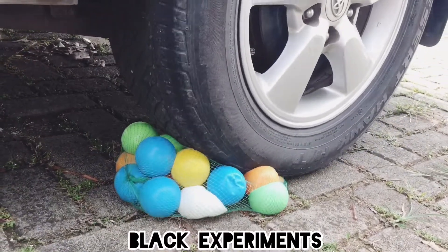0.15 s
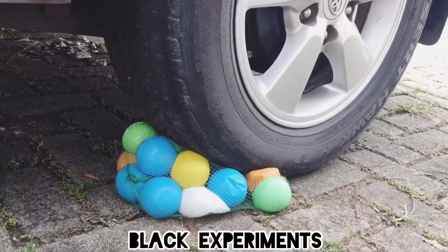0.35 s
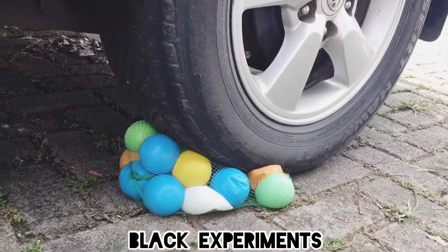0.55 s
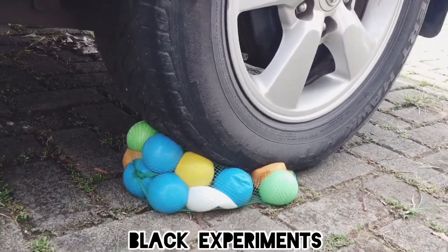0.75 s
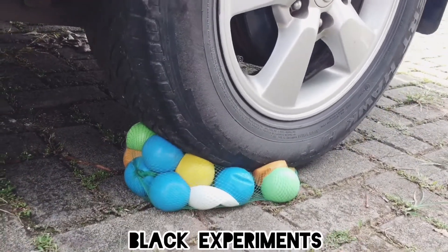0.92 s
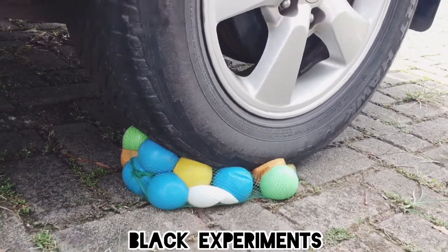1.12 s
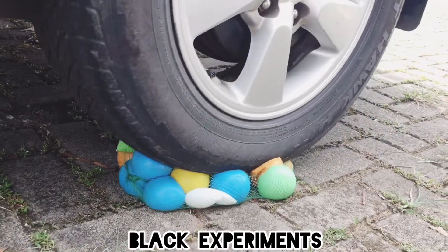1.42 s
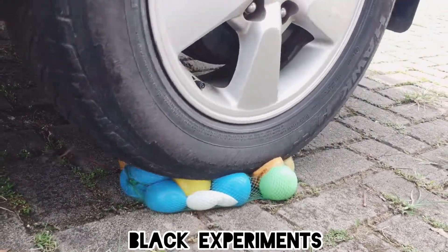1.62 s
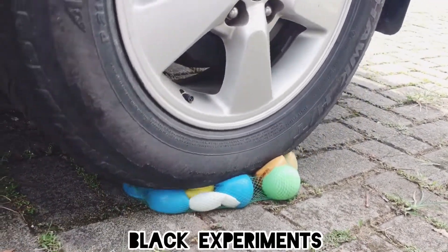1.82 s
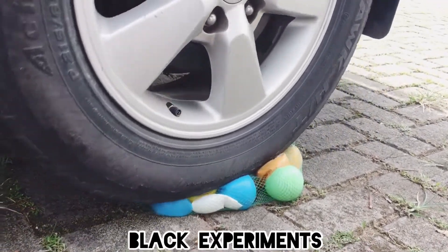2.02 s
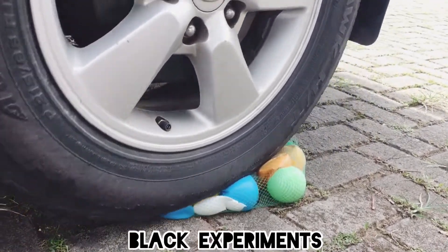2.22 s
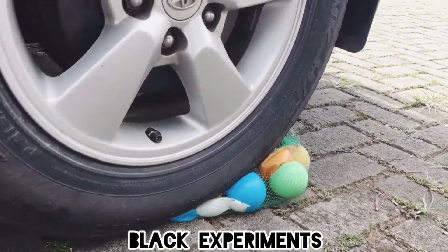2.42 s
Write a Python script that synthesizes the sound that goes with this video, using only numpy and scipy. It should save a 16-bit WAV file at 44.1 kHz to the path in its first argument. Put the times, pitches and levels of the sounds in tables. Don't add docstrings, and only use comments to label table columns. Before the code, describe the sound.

Hollow plastic balls crack, pop and burst under a slowly rolling car tyre, engine idling beneath

```python
import sys
import numpy as np
from scipy import signal
from scipy.fft import rfft, irfft
from scipy.io import wavfile
from scipy.ndimage import uniform_filter1d

SR = 44100
rng = np.random.default_rng(int(sys.argv[2]) if len(sys.argv) > 2 else 0)


def generate_wav(sig):
    pcm = np.round(np.clip(np.atleast_2d(sig).T, -1, 1) * 32767).astype(np.int16)
    wavfile.write(sys.argv[1], SR, pcm)


def invert_db(x):
    u = np.asarray(x, float) / 20
    return 10 ** u


N = 112454

# time in seconds, crackle level in dB, escaping air level in dB.
WEIGHT_ON_PILE = [(0, -37.5, -41), (.25, -29, -43), (.55, -32.5, -42.5), (.9, -35.5, -43), (1.02, -35, -54),
                  (1.14, -50, -64), (1.2, -37, -45.5), (1.45, -38.5, -53), (1.51, -45, -37.5),
                  (1.535, -36, -30), (1.67, -30.5, -43.5), (1.82, -33, -26), (1.91, -35, -31.5),
                  (2.0, -37, -38), (2.05, -27, -38), (2.2, -29.5, -24.5), (2.42, -31.5, -35),
                  (2.55, -29, -56)]


def evened(x):
    return x / np.sqrt(np.mean(x ** 2) + 1e-20)


def curve(rows, col=1):
    rows = np.array(rows)
    return np.interp(np.arange(N) / SR, rows[:, 0], rows[:, col])


def add(mix, s, sound):
    part = mix[max(round(s * SR), 0):][:len(sound)]
    part += sound[:len(part)]


def noise(points, size=N):
    hz = np.fft.rfftfreq(size, 1 / SR)
    f, db = np.transpose(points)
    gain = invert_db(np.interp(np.log(hz + 1), np.log(f + 1), db, left=-60))
    return evened(irfft(rfft(rng.standard_normal(size)) * gain, size))


def wander(smoothing, size=N):
    return evened(uniform_filter1d(rng.standard_normal(size), smoothing))


def resonate(x, hz, width):
    r = np.exp(-np.pi * width / SR)
    return signal.lfilter([1 - r * r, 0, r * r - 1], [1, -2 * r * np.cos(2 * np.pi * hz / SR), r * r], x) / 2


def resonate_twice(x, hz, width):
    return evened(resonate(resonate(x, hz, width), hz, width))


def engine():
    # time in seconds, engine cycles per second.
    cycle_speed = [(0, 24.15), (.6, 24.05), (1.1, 23.74), (1.8, 24.29), (2.1, 26.14), (2.55, 26.35)]
    # multiple of the cycle rate, level in dB.
    low_tones = [(2, -36), (3, -48.5), (4, -36), (5, -46.5), (6, -56), (8, -42), (9, -52.5)]
    # pitch in Hz, width in Hz, level in dB.
    pipe_modes = [(213, 17, 0), (266, 12, 9), (344, 96, -4.5), (513.5, 13, 0.5), (714, 20, 3)]
    # frequency in Hz, level in dB.
    block_colour = [(30, -34), (45, -3), (262, -12.5), (826, -16.5), (1150, -20.5), (1870, -14.5),
                    (2230, -23), (2960, -19.5), (15500, -111)]
    weak_firing, jitter = 0.086, 0.027
    knock_depth, knock_fade, knock_lag = 3.7, 0.39, 0.45
    turns = np.cumsum(curve(cycle_speed)) / SR + 0.96
    tones = np.zeros(N)
    for k, db in low_tones:
        tone = np.sqrt(2) * np.cos(2 * np.pi * k * turns)
        tones += invert_db(db) * tone * (1 + 0.41 * wander(2500))

    fire = np.floor(2 * turns + jitter * wander(900))
    strength = np.where(fire % 2, weak_firing, 1) * invert_db(0.73 * rng.standard_normal(N))
    pulses = (np.diff(fire, prepend=fire[0]) > 0) * strength
    drive = evened(pulses) + 1.16 * rng.standard_normal(N)
    drive = uniform_filter1d(uniform_filter1d(drive, size=24), size=24)
    pipe = evened(sum(invert_db(db) * resonate(drive, hz, max(width, 25)) for hz, width, db in pipe_modes))

    knock = 1 + knock_depth * np.exp(-((turns - knock_lag) % 1) / knock_fade)
    block = evened(noise(block_colour) * knock)
    whine = np.sqrt(2) * np.cos(2 * np.pi * 21.2 * turns + 0.34 * wander(1500))
    return tones + invert_db(-43) * whine + invert_db(-29.5) * pipe + invert_db(-29.5) * block


def crackle():
    folds_per_s, spread_db = 3500, 2.4
    size = invert_db(spread_db * np.minimum(rng.exponential(1, N), 3.5))
    size = size * (rng.random(N) < folds_per_s / SR)
    kind = rng.integers(0, 24, N)
    t = np.arange(600) / SR
    out = np.zeros(N)
    for k, hz in enumerate(np.geomspace(900, 7000, num=24)):
        fade = t * hz * np.exp(-t * hz / 0.45)
        fold = np.sin(2 * np.pi * hz * t) * fade * (hz / 1e3) ** -0.2
        out += signal.oaconvolve(size * (kind == k), fold)[:N]
    return evened(out) * invert_db(curve(WEIGHT_ON_PILE) - 0.5)


def air():
    # frequency in Hz, level in dB.
    leak_colour = [(1500, -17), (3500, 0), (4700, -6.5), (7200, -5.5), (10500, -12), (14500, -10.5),
                   (16500, -14.5)]
    # frequency in Hz, level in dB.
    puff_colour = [(3000, -8), (6000, 12), (9000, 16), (10800, 9), (15000, 15), (16500, -14.5)]
    puff_starts = (.086, .2555, .486, .761, 1.21, 1.393, 1.522, 1.8315, 2.028)
    # length of the puff in seconds, level in dB.
    puff_sizes = [(0.011, -43), (0.095, -27.5), (.014, -28), (.012, -28), (.04, -46), (.018, -28),
                  (0.2, -35), (.016, -21), (0.35, -32.5)]
    jet_times = (2.18, 2.21, 2.3, 2.44)
    t = np.arange(N) / SR
    puffs = np.zeros(N)
    for s, (length, db) in zip(puff_starts, puff_sizes):
        rise = np.clip((t - s) * 300, 0, 1)
        fall = np.clip((s + length - t) / (0.71 * length), 0, 1)
        puffs += invert_db(db) * rise * fall
    leak = noise(leak_colour) * invert_db(curve(WEIGHT_ON_PILE, col=2))
    jet = resonate_twice(rng.standard_normal(N), 5900, 2600) * invert_db(-23.5)
    jet_opening = np.interp(t, np.sort(jet_times), [0.0072, 0.98, 0.48, 0.015])
    flicker = invert_db(1.4 * wander(300))
    return flicker * (leak + noise(puff_colour) * puffs + jet * jet_opening)


def crease(db, hz, bright_db):
    t = np.arange(1024) / SR
    ring_cycles, crack_t60 = 5.1, 0.003
    ring = np.sin(2 * np.pi * hz * t) * invert_db(-60 * t * np.sqrt(hz * 1000) / ring_cycles / 2)
    crack = evened(resonate(rng.standard_normal(1024), 6000, 7000))
    return invert_db(db) * (ring + crack * invert_db(bright_db - 60 * t / crack_t60))


def snap(db, hz, bright_db):
    # multiple of the main pitch, level in dB.
    wall_modes = [(1.0, 1.5), (1.62, -7), (2.3, -10), (3.4, -2.5)]
    hold = 0.0017
    crack_t60, cavity_t60, rattle_t60 = 0.0072, 0.0036, 0.026
    ring_t60 = 0.009 / (hz / 1000) ** 0.48
    t = np.arange(4096) / SR
    after = np.maximum(t - hold, 0)

    ring = np.zeros(4096)
    for k, (ratio, mode_db) in enumerate(wall_modes):
        level = mode_db - hz * (ratio - 1) / 1000 - 60 * after * ratio ** 0.5 / ring_t60
        pitch = hz * ratio
        if k > 0:
            level = level + 2 * rng.standard_normal() + 0.45 * (bright_db + 3.5)
            pitch *= 1 + 0.063 * rng.standard_normal()
        ring += invert_db(level) * np.sin(2 * np.pi * min(pitch, 15e3) * t)

    cavity_hz = 1150 * (1 + 0.11 * rng.standard_normal())
    cavity = invert_db(-0.5 - 60 * after / cavity_t60) * np.sin(2 * np.pi * cavity_hz * t)
    cavity *= np.minimum(t / hold, 1)
    crack = evened(resonate(rng.standard_normal(4096), 5300, 8400))
    crack *= invert_db(bright_db + 4.5 - 60 * t / crack_t60)
    rattle = resonate_twice(rng.standard_normal(4096), min(hz, 2200), 3430)
    rattle *= invert_db(-5 + 0.35 * (bright_db + 17.0) - 60 * t / rattle_t60)
    ring *= np.minimum(t / 0.0001, 1)
    rattle *= np.minimum(t / 0.00019, 1)
    return invert_db(db - 9.0) * (ring + cavity + crack + rattle)


def groan(hz, sag_db, length, db):
    t = np.arange(0, length, 1 / SR)
    slips = rng.standard_normal(len(t))
    sag = resonate_twice(slips, 0.42 * hz, 200)
    sound = resonate_twice(slips, hz, 600) + invert_db(sag_db) * sag
    return invert_db(db) * sound * np.sqrt(t / length)


def burst(colour, db, hold, t60, thump_db):
    thump_hz, thump_lag, thump_t60, thump_drop = 50, 0.0155, 0.058, 150
    rip_t60, treble_t60 = 0.0072, 0.035
    t = np.arange(8192) / SR
    ragged = invert_db(2 * wander(60, 8192))
    rush = noise(colour, size=8192) * ragged
    low = uniform_filter1d(uniform_filter1d(rush, size=7), size=7)
    after = np.maximum(t - hold, 0)
    blast = low * invert_db(db - 60 * after / t60)
    blast += (rush - low) * invert_db(db - 60 * after / treble_t60)
    rip = rng.standard_normal(8192) * invert_db(db - 8 - 60 * t / rip_t60)

    late = t - thump_lag
    swell = invert_db(thump_db - 60 * np.maximum(late, 0) / thump_t60) * np.minimum(t / thump_lag, 1) ** 2
    cycles = thump_hz * late - thump_drop * np.minimum(late, 0) ** 2 / thump_lag / 2
    return blast + rip - swell * np.sin(2 * np.pi * cycles)


def balls():
    # start in seconds, peak in dB, ring in Hz, crack brightness in dB.
    creases = [(0.0286, -18, 6500, -13), (.0868, -13.5, 4170, -8), (0.0933, -14, 3070, -5),
               (.1065, -29, 2500, -6), (0.147, -24, 2500, -18), (0.2136, -23, 8900, -5),
               (0.2617, -12, 1000, -10), (0.3026, -10, 1010, -25), (0.4111, -24, 5000, 0),
               (0.4711, -14, 1000, -25), (.658, -29, 11000, 3), (0.683, -14, 2500, -15),
               (0.806, -19, 6100, 0), (.931, -12, 900, -12), (1.031, -34, 3800, -4),
               (1.161, -26, 1000, -11), (1.224, -27, 1500, -11), (1.248, -24, 6000, -8),
               (1.2983, -18, 1390, -6), (1.316, -22, 1500, -9), (1.398, -25, 5000, 0),
               (1.467, -20, 2500, -3), (1.481, -16, 3500, -5), (1.5224, -11, 1500, -6),
               (1.5435, -12, 1790, -6), (1.6447, -10, 1150, -5), (1.6878, -16, 2900, -3),
               (1.7, -16, 2900, -12), (1.727, -18, 6000, -6), (1.729, -14, 1800, -8),
               (1.737, -12, 1600, -3), (1.792, -20, 6500, -13), (1.8072, 1.5, 3370, -14),
               (1.82, -1, 1800, -14), (1.827, -8, 3000, -5), (1.874, -13, 2020, -3),
               (1.934, -4.5, 3430, 1.5), (1.962, -19, 10000, 1), (1.975, -19, 2000, -10),
               (1.989, -15.5, 2540, 2), (2.0061, -8, 3380, -9), (2.16, -10, 3020, -10),
               (2.5107, -24, 9000, 1), (0.9203, -14, 1300, -19)]
    # start in seconds, peak in dB, ring in Hz, crack brightness in
    # dB.
    shell_snaps = [(0.079, -4.5, 784, -13), (0.176, -9, 1830, -4.5), (0.21, -5, 1190, -10.5),
                   (0.234, -12.5, 1320, -5), (0.265, -7.5, 1160, 1), (0.282, -4.5, 1146, -3),
                   (0.328, 5.5, 2030, -4.5), (0.508, -5.5, 1113, 0.5), (0.759, -13.5, 1040, 13),
                   (0.837, 6, 1035, 2.5), (0.856, -8.5, 650, -1), (0.88, -2.5, 1120, -9),
                   (0.918, -13, 900, -10), (1.079, -22, 1820, -3), (1.094, -23, 1900, -3.5),
                   (1.1875, -15.5, 880, -13), (1.267, -9.5, 1000, -4.5), (1.275, -9.5, 1070, -5),
                   (1.295, -7, 1320, -10.5), (1.391, -8.5, 805, 3.5), (1.4103, 2, 1940, -13.5),
                   (0.3517, 0.5, 1420, -1.5), (0.4845, -4, 5930, 3),
                   (1.422, -12, 2010, -8), (1.4893, 6, 1600, -6.5), (1.528, -7, 1450, 0.5),
                  (1.548, -8, 870, -9), (1.565, -3.5, 1000, -30), (1.62, -3.5, 1150, -13),
                  (1.639, -2, 1150, -9.5), (1.6915, -4, 2000, -27), (1.7098, -4.5, 2880, -5),
                  (1.749, -6, 2140, -15), (1.758, -5.5, 1103, -6.5), (1.8, 1.5, 1150, -10),
                  (1.8645, -6, 1370, 0), (1.93, -6.5, 1150, 4), (1.955, -4, 1433, -16),
                  (2.05, -4, 1530, -10.5), (2.118, -6.5, 2540, -15), (2.152, -5.5, 1320, -3.5),
                  (2.1927, 9.5, 1466, -37), (2.469, -8.5, 775, -15.5), (2.508, -9, 1720, -15),
                  (0.2548, -13.5, 6930, 6.5), (2.0058, -5, 6200, -32)]
    # start in seconds, peak in dB, ring in Hz.
    ticks = [(0.0885, -12, 780), (0.115, -25, 1500), (0.7857, -11, 3270), (1.1988, -18.5, 3470),
             (1.462, -21, 4470), (1.63, -9.5, 1150), (1.7728, -8.5, 6493), (1.943, -17, 2500),
             (2.3544, -15.5, 930)]
    burst_starts = (.9525, 1.8305)
    # blast level in dB, hold in seconds, 60 dB fade in seconds, thump level in dB.
    burst_sizes = [
        (4.5, 0.0054, 0.045, -1.5),
        (-0.5, 0.0046, 0.027, -17.5),
    ]
    # frequency in Hz, level in dB.
    full_colour = [(120, -6), (380, 3), (800, -1), (1600, 0), (2400, -10), (3500, -15), (8000, -27),
                   (15500, -34)]
    # frequency in Hz, level in dB.
    thin_colour = [(100, -9), (200, -1), (400, -11.5), (700, -3), (1830, -5), (4290, -20.5), (9000, -18.5),
                   (16000, -34)]
    groan_pitches = (950, 1000)
    sag_levels = (0, -12)
    # length of the groan in seconds, level in dB.
    groan_sizes = [(.015, -12), (.028, -17)]
    out = np.zeros(N)
    for s, *row in creases:
        add(out, s, crease(*row))
    for s, *row in shell_snaps:
        add(out, s, snap(*row))
    for s, db, hz in ticks:
        add(out, s, snap(db, hz, -5.5))
    for s, colour, row in zip(burst_starts, (full_colour, thin_colour), burst_sizes):
        add(out, s, burst(colour, *row))
    for s, hz, sag_db, (length, db) in zip(burst_starts, groan_pitches, sag_levels, groan_sizes):
        add(out, s - length, groan(hz, sag_db, length, db))
    return out


def echo(hits):
    t = np.arange(6000) / SR
    bounces = rng.choice([-1., 1.], 6000) * (rng.random(6000) < 0.05)
    tail = bounces * invert_db(-60 * t / 0.075) * (t > 0.002)
    tail = signal.lfilter([1], [1, -1.4, 0.49], tail)
    return invert_db(-18.5) * signal.fftconvolve(hits, tail / np.linalg.norm(tail))[:N]


def scene():
    # time in seconds, gain in dB.
    engine_gain = [(0, -0.5), (.2, 0), (.6, 3), (.9, 3), (.99, -2), (1.05, -14), (1.14, -20), (1.18, -7.5),
                   (1.4, -6.5), (1.55, -2.5), (1.8, 0.5), (2.1, -2), (2.55, -0.5)]
    hits = balls()
    mix = hits + echo(hits) + crackle() + air() + engine() * invert_db(curve(engine_gain))
    return mix[None]


def roll_off(x):
    return signal.sosfilt(signal.butter(12, 16470, fs=SR, output="sos"), x)


def record(dry):
    treble_cut = signal.firwin(511, 15900, window=("kaiser", 9), fs=SR)
    x = signal.oaconvolve(dry, treble_cut[None], "same")
    bass_cut = signal.butter(N=2, Wn=46, btype="high", fs=SR, output="sos")
    x = signal.sosfilt(bass_cut, x)
    return roll_off(np.clip(x, -1, 1))


dry = scene()
out = record(dry)
generate_wav(out)
```